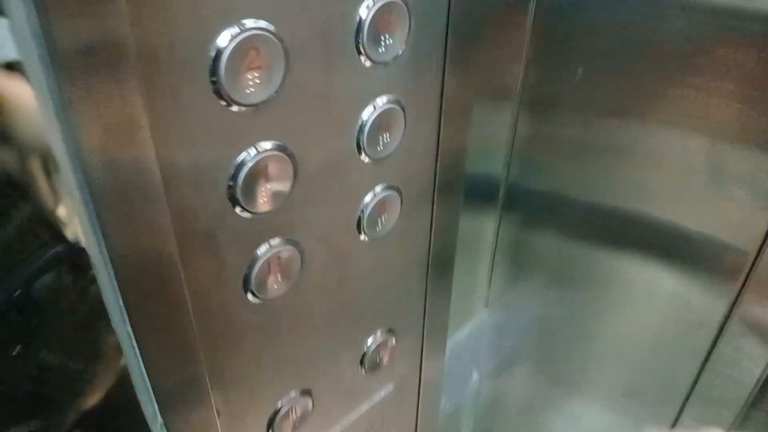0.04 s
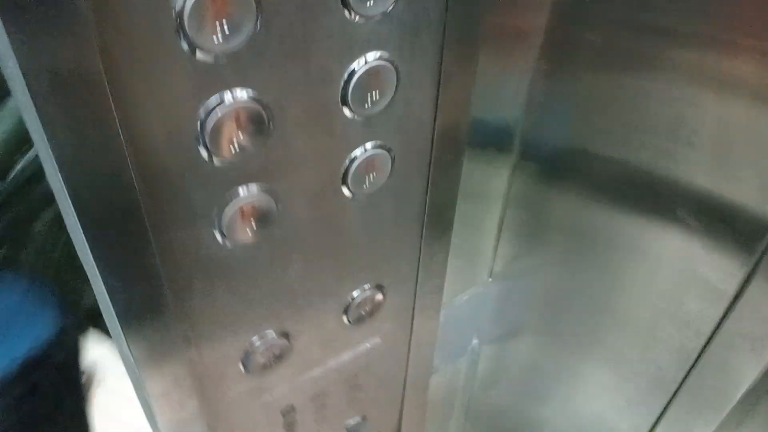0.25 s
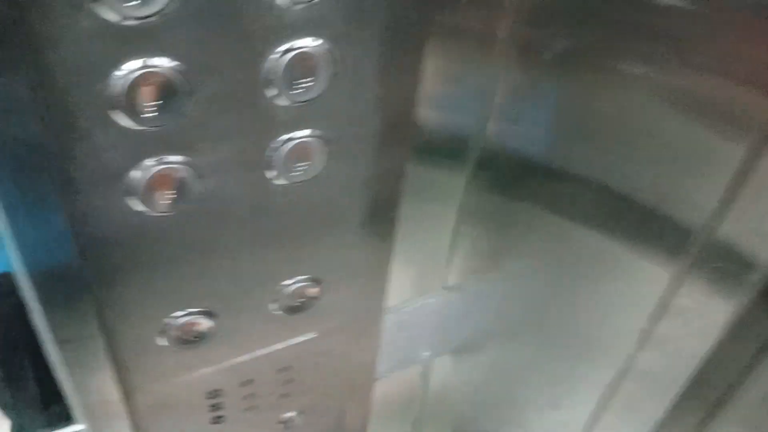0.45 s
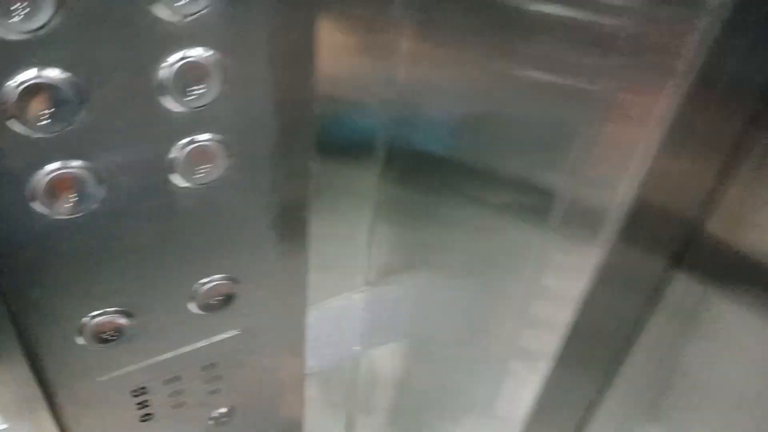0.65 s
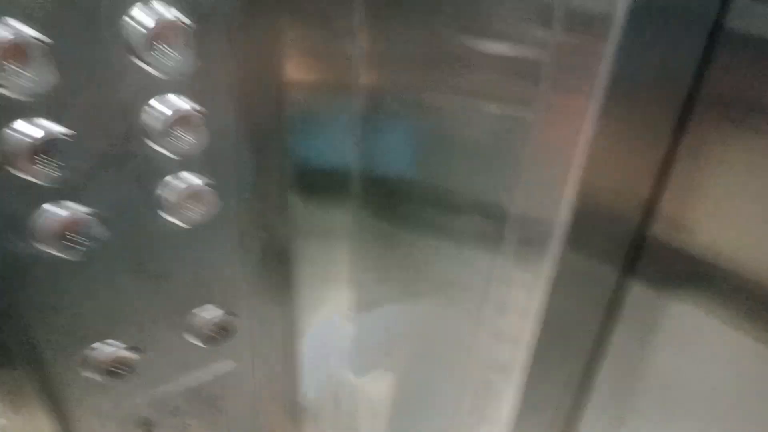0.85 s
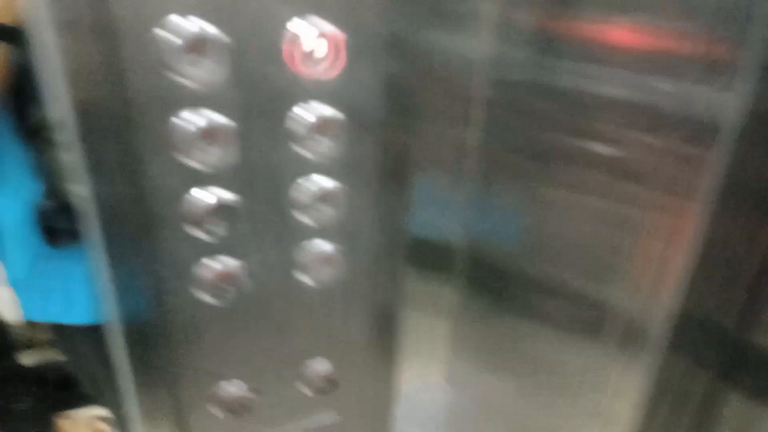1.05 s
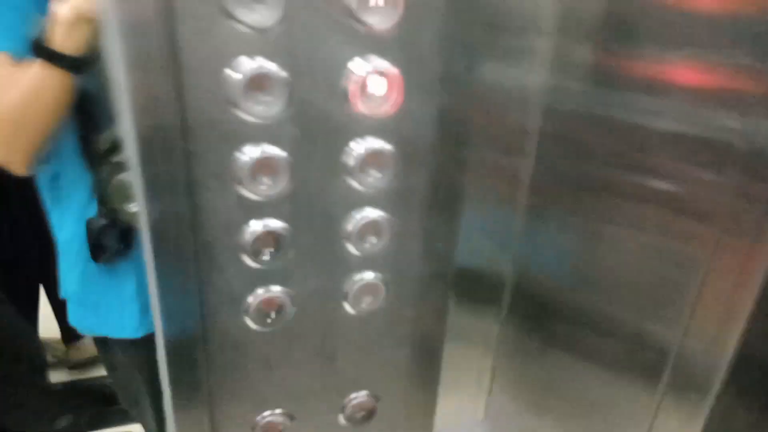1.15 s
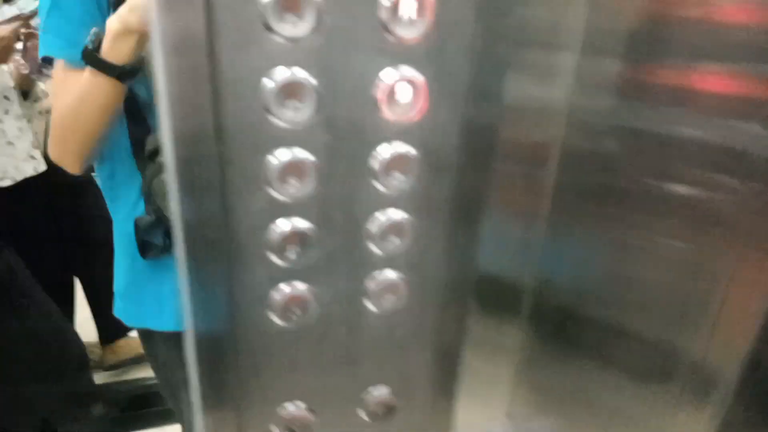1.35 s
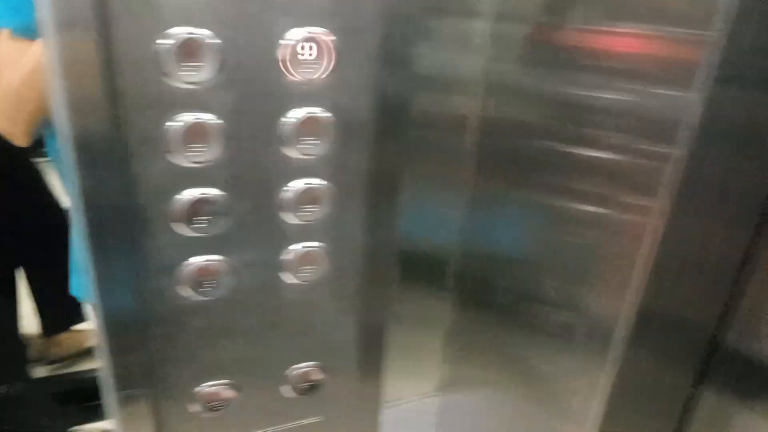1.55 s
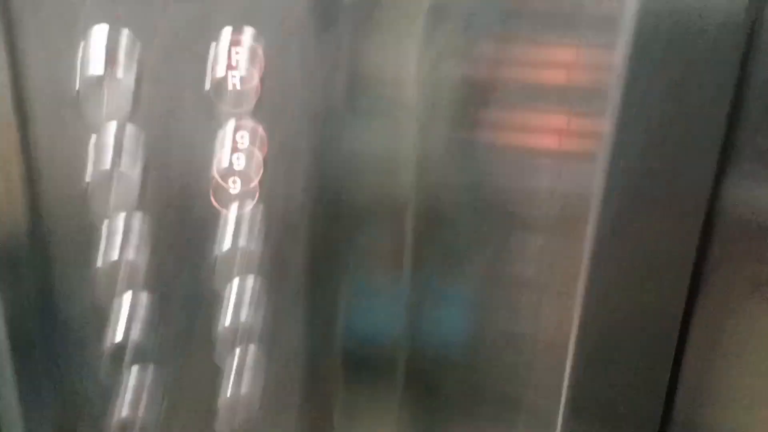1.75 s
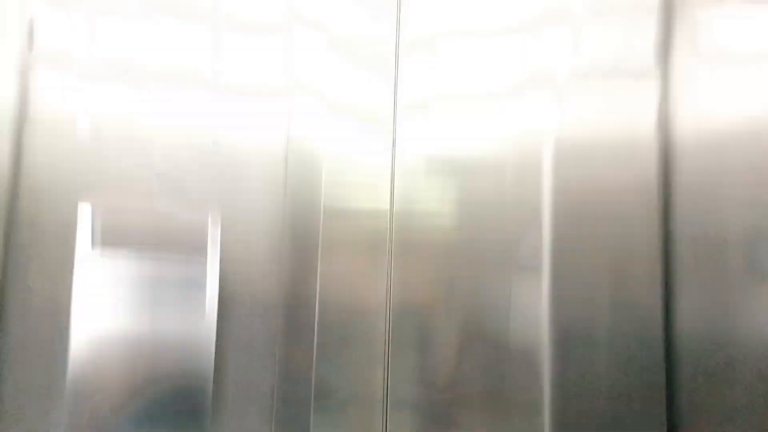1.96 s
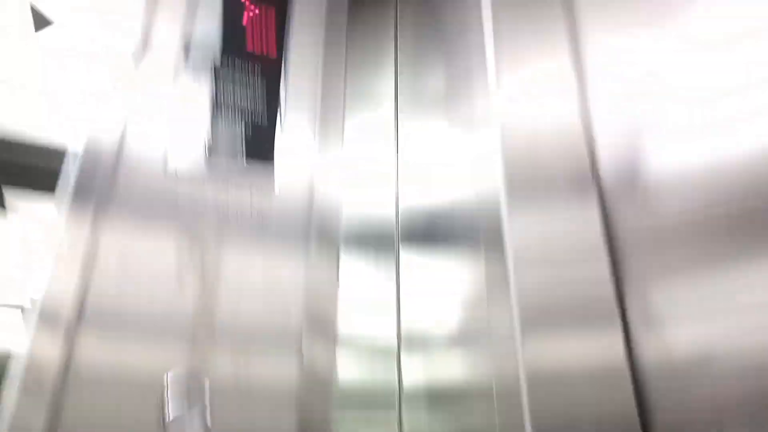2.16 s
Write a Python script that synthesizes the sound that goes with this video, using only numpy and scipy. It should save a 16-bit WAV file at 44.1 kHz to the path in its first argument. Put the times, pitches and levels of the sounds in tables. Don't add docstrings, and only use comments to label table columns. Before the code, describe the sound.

Inside a small lift car, sliding metal doors hiss and shudder along their track, thump closed, rebound lightly and settle, leaving soft fan air and low rumble, with cloth and finger crackles close to the phone.

```python
import sys
import numpy as np
from scipy import signal
from scipy.io import wavfile
from scipy.ndimage import uniform_filter1d

SR = 44100
rng = np.random.default_rng(int(sys.argv[2]) if len(sys.argv) > 2 else 0)


def rack_gain(trim_db):
    fader = np.asarray(trim_db, float)
    return 10 ** (fader / 20)


def master_out(mix):
    frames = np.transpose(np.atleast_2d(mix))
    ceiling = np.clip(frames, -1, 1)
    pcm = np.round(ceiling * 32767).astype(np.int16)
    wavfile.write(sys.argv[1], SR, pcm)


N = 97284


def svf(x, hz, width_hz):
    b, a = signal.iirpeak(min(hz, .45 * SR), max(hz / width_hz, .3), fs=SR)
    return signal.lfilter(b, a, x)


def svf_twice(x, hz, width_1_hz, width_2_hz):
    return svf(svf(x, hz, width_1_hz), hz, width_2_hz)


def band_pass(x, order, hz, ratio):
    sos = signal.butter(order, [hz / ratio, hz * ratio], "band", fs=SR, output="sos")
    return signal.sosfilt(sos, x)


def unit(x):
    return x / np.sqrt(np.mean(x ** 2) + 1e-20)


def noise(size=N):
    return rng.standard_normal(size)


def seconds(size):
    return np.arange(size) / SR


def decay(t, t60_s):
    return np.exp(-np.log(1000) * t / t60_s)


def walk(rate_hz):
    hold = int(SR / rate_hz / 64) + 1
    steps = np.repeat(rng.standard_normal(400), hold)
    steps = uniform_filter1d(uniform_filter1d(steps, hold), hold)
    return 1.31 * np.interp(np.arange(N) / 64, np.arange(len(steps)), steps)


def col(table, index):
    rows = np.array(table, float)
    return np.interp(seconds(N), rows[:, 0], rows[:, index])


def gate(length_s, rise, fall):
    u = seconds(SR // 4) / length_s
    ramp = np.minimum(u / rise, (1 - u) / fall)
    return np.sin(np.pi / 2 * np.clip(ramp, 0, 1)) ** 2


def add(out, start_s, x):
    i = int(start_s * SR)
    out[i:i + len(x)] += x[:N - i]


def body(table, flicker_db, rate_hz):
    streak_q, streak_share, streak_full_hz = 45, .55, 2000
    out = 0
    for hz, width_hz, level_db in table:
        push = noise()
        spread = np.linspace(-.6, .6, num=10) + rng.uniform(-0.06, 0.058, size=10)
        streaks = 0
        for mode_hz in hz + width_hz * spread:
            flare = np.clip(walk(30) - .5, 0, 1)
            mode = svf_twice(push, mode_hz, mode_hz / streak_q, 2 * mode_hz / streak_q)
            streaks = streaks + flare * mode / np.sqrt(mode_hz)
        broad = unit(svf_twice(push[::-1], hz, 1.42 * width_hz, 1.42 * width_hz))
        share = streak_share * min(hz / streak_full_hz, 1)
        out = out + rack_gain(level_db + flicker_db * walk(rate_hz)) * (broad + share * unit(streaks))
    return unit(out)


def shaft_rumble():
    # hz, density_db (per Hz)
    spectrum = [(12, -30), (20, -2), (97, -11), (452, -41), (597, -59), (800, -70), (1040, -82),
                (1760, -120)]
    # start_s, level_db
    shaft_curve = [(0, -45.5), (.7, -45), (.94, -48.5), (.96, -54), (.995, -62), (1.02, -47.5),
                   (1.08, -49.5), (1.3, -48.5), (1.38, -47.5), (1.5, -47.5), (1.63, -47.5), (1.7, -52),
                   (1.8, -51.5), (1.825, -59.5), (1.865, -62), (1.89, -48.5), (2.05, -49.5), (2.2, -54.5)]
    curve_hz, curve_db = np.array(spectrum).T
    out = 0
    for hz in 700 * 2 ** (-np.arange(11) / 2):
        density_db = np.interp(np.log(hz), np.log(curve_hz), curve_db)
        band_db = density_db + 10 * np.log10(hz) + 0.5 * walk(9.7)
        out = out + rack_gain(band_db) * unit(svf_twice(noise(), hz, hz / 2, hz / 2))
    return rack_gain(col(shaft_curve, index=1)) * unit(out)


def ceiling_fan():
    # hz, width_hz, level_db
    fan_modes = [(1310, 490, -19), (2220, 752, -1), (4000, 940, -4), (7200, 1200, 14), (9740, 2500, 19.5),
                 (13500, 1500, -35)]
    return rack_gain(-64.5) * body(fan_modes, 2.2, 36)


def whine():
    return rack_gain(-71) * unit(svf(noise(), 10002, 25))


def rubs():
    # start_s, length_s, level_db, centre_hz, hiss_share
    rub_events = [(.1, 0.12, -58, 9600, 1.4), (0.625, 0.14, -50, 5930, 0.98), (0.955, 0.07, -54, 7400, 1.5),
                  (1.239, 0.03, -52, 9800, 1.5), (1.236, .028, -63, 13200, 2),
                  (1.248, 0.028, -59, 6500, 1.5), (1.488, 0.072, -52.5, 9200, 2.4),
                  (1.49, .045, -68, 12300, 1.5), (0.507, 0.046, -48, 5860, 1.5),
                  (1.489, 0.29, -60, 6880, 2.5), (1.269, 0.21, -56.5, 6800, 2.5),
                  (1.52, 0.24, -66.5, 9300, 2.5), (1.799, 0.11, -64, 7200, 2.5),
                  (1.797, .12, -62.5, 9000, 2.5), (1.995, 0.24, -63, 10000, 1.1),
                  (2.014, 0.13, -67, 13500, .8), (2.15, 0.12, -63, 7800, 2.9),
                  (1.077, 0.11, -56.5, 9000, 0.88)]
    grains_per_s, spread_db = 1100, 2.2
    out, size = np.zeros(N), SR // 4
    for start_s, length_s, level_db, hz, hiss in rub_events:
        hits = rng.random(size) < grains_per_s / SR
        grains = hits * noise(size) * rack_gain(spread_db * rng.exponential(size=size))
        rub = band_pass(unit(grains) + hiss * noise(size), 3, hz, 1.12)
        rub = rub * gate(length_s, 0.053, 0.83)
        add(out, start_s, rack_gain(level_db) * unit(rub) * np.sqrt(4 * length_s))
    return out


def snaps():
    # peak_s, peak_db, pitch_hz
    snap_events = [(1.4913, -36, 9300), (1.4932, -30.5, 9030), (1.4932, -40, 6700), (1.495, -39, 6600),
                   (1.4965, -45, 12100), (1.5, -44, 6700), (1.501, -40, 9500), (1.5035, -39, 10000),
                   (1.5062, -38, 9000), (1.5095, -40, 9500), (1.5125, -40, 9200), (1.5128, -44, 6440),
                   (1.52, -42, 10000), (.4806, -32, 6600), (.4822, -31, 6000), (.4853, -36, 6300),
                   (.51, -34, 6050), (.5138, -31, 6000), (.5205, -35, 6200), (.5302, -37, 6200),
                   (1.6528, -44, 6880), (1.804, -50, 6900), (1.247, -43, 10200), (1.25, -42, 9700),
                   (1.1195, -40, 10500), (1.131, -37, 10000), (1.1433, -37, 4100), (1.1435, -42, 10500),
                   (1.1478, -27, 10500), (1.1487, -27, 9000), (1.1487, -30, 5200), (1.1262, -40, 2350),
                   (1.448, -56, 1500)]
    rise_s, t60_s = .0003, 0.0045
    out, t = np.zeros(N), seconds(SR // 50)
    shape = (1 - np.exp(-t / rise_s)) * decay(t, t60_s)
    shape = shape / shape.max()
    for peak_s, peak_db, hz in snap_events:
        tone = np.sin(2 * np.pi * (hz * t + rng.random()))
        add(out, peak_s - rise_s, rack_gain(peak_db) * shape * tone)
    return out


def stutter():
    # start_s, peak_db
    slips = [(2.0015, -47), (2.007, -50), (2.0215, -44), (2.025, -38.5), (2.029, -48), (2.035, -46),
             (2.039, -45), (2.042, -41), (2.045, -42), (2.059, -43), (2.0615, -46), (2.067, -50),
             (2.0725, -47), (2.0755, -43), (2.083, -49), (2.095, -52), (2.106, -49), (2.111, -47),
             (2.168, -48), (2.184, -48), (1.71, -54), (.82, -52)]
    # hz, width_hz, level_db
    case_modes = [(9700, 2100, 1), (12200, 2800, -7), (14400, 3000, -10)]
    out, t = np.zeros(N), seconds(SR // 50)
    for start_s, peak_db in slips:
        push = noise(len(t)) * np.exp(-t / 0.00043)
        click = sum(rack_gain(db) * svf(svf(push, hz, width_hz), hz, width_hz) for hz, width_hz, db in case_modes)
        add(out, start_s, rack_gain(peak_db) * click / np.abs(click).max())
    return out


def slide():
    # start_s, level_db, brightness_db
    slide_curve = [(0, -53.5, -42), (.14, -44, -8), (.22, -53.5, -17), (.4, -44, -9.5), (.46, -46.5, -14),
                   (.53, -43.5, -10.5), (.62, -44, -12.5), (.67, -40, -12.5), (.72, -51.5, -13),
                   (.8, -51.5, -27), (1.1, -51.5, -45), (1.2, -52.5, -13.5), (1.32, -48.5, -24),
                   (1.39, -54, -12.5), (1.44, -60.5, -26), (1.6, -68, -30), (1.75, -70, -28), (2.2, -80, 9)]
    # hz, width_hz, level_db
    seal_modes = [(6260, 1150, 2.5), (9580, 1400, -6.5), (7800, 2000, -6), (3885, 874, -15)]
    # hz, width_hz, level_db
    rush_modes = [(10200, 2800, -2), (14100, 8300, -1), (3469, 2300, 2)]
    hiss = body(seal_modes, 1.28, 40.13)
    rush = rack_gain(col(slide_curve, index=2) + 4) * body(rush_modes, 1.05, 30)
    return rack_gain(col(slide_curve, index=1)) * (hiss + rush)


def rollers():
    # start_s, level_db, brightness_db
    roll_curve = [(0, -45.5, -19), (.04, -42.5, -13.5), (.11, -44, -13), (.2, -51.5, -9), (.3, -50, -11),
                  (.45, -58, -3.5), (.49, -52, -3.5), (.62, -50, -8.5), (.68, -60, -16), (.77, -56.5, -7),
                  (.83, -44.5, -13.5), (.95, -49, -17), (1.03, -74, 0), (1.25, -68, 0), (1.31, -78, 12),
                  (1.42, -70, -8.5), (1.7, -72.5, -5.5), (2.2, -68, -8)]
    # hz, width_hz, level_db
    track_modes = [(322, 92, 5), (395.3, 87.6, -2.5), (618.4, 187, -2.5), (907, 181, -8.5)]
    # hz, width_hz, level_db
    clatter_modes = [(1249, 184, 3), (1500, 86, -1.5), (2000, 1260, 4.5), (2680, 1800, -3)]
    rolling = body(track_modes, 2.6, 45)
    clatter = rack_gain(col(roll_curve, index=2)) * body(clatter_modes, 2.5, 35)
    return rack_gain(col(roll_curve, index=1)) * (rolling + clatter)


def trim():
    # start_s, length_s, pitch_hz, level_db
    trim_events = [(.48, 0.02, 11650, -50), (.02, .07, 325, -47), (.468, 0.051, 1200, -54.5),
                   (.5, 0.042, 480, -55), (.59, 0.078, 750, -59), (.8, 0.079, 362, -54),
                   (.89, .1, 300, -54.5), (0.71, .1, 440, -58), (.59, 0.087, 375, -58),
                   (.64, 0.037, 210, -50), (.4, .04, 136, -47.5)]
    out, size = np.zeros(N), SR // 4
    for start_s, length_s, hz, level_db in trim_events:
        pitch_hz = hz * (1 + 0.014 * walk(40)[:size])
        size_db = level_db + 2.9 * walk(50)[:size]
        ring = np.sin(2 * np.pi * np.cumsum(pitch_hz) / SR) * rack_gain(size_db)
        add(out, start_s, ring * gate(length_s, 0.24, 0.44))
    return out


def panels():
    # start_s, length_s, pitch_hz, level_db
    shudder_events = [(0.031, 0.095, 109.7, -49), (0.017, 0.071, 340, -48), (0.819, 0.105, 369, -54.5),
                      (0.093, 0.099, 177, -47), (0.219, 0.042, 156.6, -40.5), (.27, 0.23, 110, -48),
                      (0.326, 0.091, 186, -48.5), (0.467, 0.18, 219.9, -44.5), (.48, 0.09, 114.5, -45.5),
                      (0.595, 0.099, 125.3, -39.5), (0.744, 0.12, 175.7, -50), (0.799, 0.035, 127, -44.5),
                      (0.465, 0.062, 934, -55.5), (0.538, 0.044, 2000, -60), (0.584, 0.08, 661.4, -56),
                      (0.97, 0.061, 102.3, -52.5), (.99, 0.031, 205, -58), (0.00517, .07, 550, -56),
                      (0.41, .06, 230, -57.5), (0.29, 0.17, 1390, -62), (1.11, 0.058, 620, -52.5),
                      (1.241, 0.025, 1144, -59.5), (1.297, 0.089, 810, -68.5), (1.5, 0.1, 4100, -72),
                      (1.3, 0.033, 399, -57), (1.45, 0.043, 260, -56), (.215, 0.053, 120, -46),
                      (1.12, 0.034, 850, -58.5), (1.669, 0.041, 470, -67.5), (1.946, 0.191, 111.6, -53.5),
                      (0.961, 0.11, 372, -57.5)]
    panel_q, tone_share = 6.8, 1.6
    out, t = np.zeros(N), seconds(SR // 4)
    for start_s, length_s, hz, level_db in shudder_events:
        rough = svf_twice(noise(SR // 2), hz, hz / panel_q, 3 * hz / panel_q)
        rough = unit(rough[SR // 4:])
        cycles = hz * t * (1.03 - 0.29 * t) + rng.random()
        ring = tone_share * min(300 / hz, 1) * np.sin(2 * np.pi * cycles)
        shake = unit((rough + ring) * gate(length_s, 0.14, 0.46))
        add(out, start_s, rack_gain(level_db) * shake * np.sqrt(4 * length_s))
    return out


def ticks():
    # start_s, peak_db, centre_hz, t60_s
    tick_events = [
        (0.49, -32, 5800, 0.041),
        (0.5, -39, 11000, 0.1),
        (1.081, -34.5, 8100, 0.069),
        (1.244, -50, 2300, 0.05),
        (1.128, -44.5, 1310, 0.13),
        (1.1477, -27, 11800, 0.003),
        (1.1476, -29.5, 4640, 0.011),
        (1.148, -36, 5600, 0.0072),
        (2.074, -57, 2100, 0.045),
        (2.0645, -47, 2300, 0.0091),
    ]
    out, t = np.zeros(N), seconds(SR // 4)
    for start_s, peak_db, hz, t60_s in tick_events:
        ring = (noise(len(t)) + 8.6 * (t == 0)) * decay(t, t60_s)
        ring = band_pass(ring, 2, hz, 1.28)
        add(out, start_s, rack_gain(peak_db) * ring / np.abs(ring).max())
    return out


def blows():
    # start_s, pitch_hz, swings, peak_db
    blow_events = [
        (1.12, 73.4, 2.44, -19.5),
        (1.1179, 226, 1.3, -29.5),
        (1.1245, 178.6, 2.23, -27),
        (1.1423, 287, 1.6, -29),
        (1.2293, 157.7, 1.37, -26),
        (1.2429, 140, 2.1, -33),
        (1.4458, 293, 1.75, -33.5),
        (1.47, 110, .8, -37),
        (2.0647, 1140, 1.56, -40),
        (2.0668, 1050, 5.8, -52),
    ]
    out, t = np.zeros(N), seconds(SR // 4)
    for start_s, hz, swings, peak_db in blow_events:
        swing = -np.sin(2 * np.pi * hz * t) * gate(swings / hz, 0.31, 0.33)
        add(out, start_s, rack_gain(peak_db) * swing)
    return out


def scene():
    background = shaft_rumble() + ceiling_fan() + whine()
    handling = rubs() + snaps() + stutter()
    doors = slide() + rollers() + trim() + panels() + ticks() + blows()
    return (background + handling + doors)[None]


def band_limit(x):
    return signal.sosfilt(signal.butter(12, 16480, fs=SR, output="sos"), x)


def record(dry):
    knee = signal.butter(1, 11500, fs=SR, output="sos")
    top = signal.ellip(10, .2, 80, 15800, fs=SR, output="sos")
    mix = signal.sosfilt(top, signal.sosfilt(knee, dry))
    return band_limit(mix)


dry = scene()
out = record(dry)
master_out(out)
```